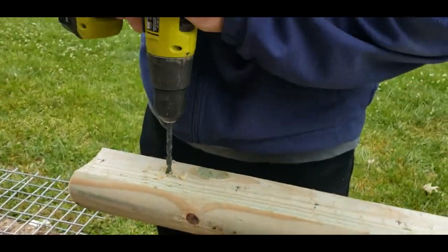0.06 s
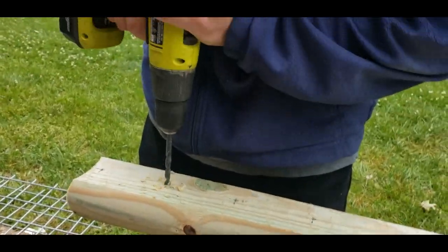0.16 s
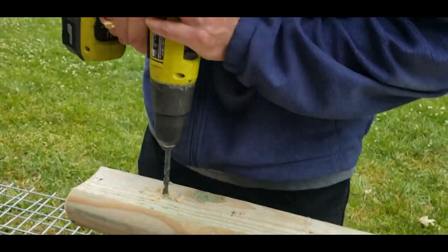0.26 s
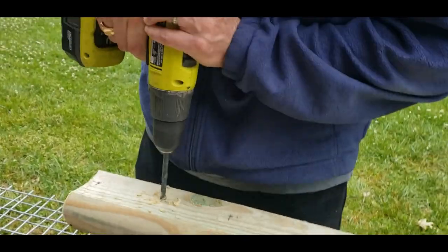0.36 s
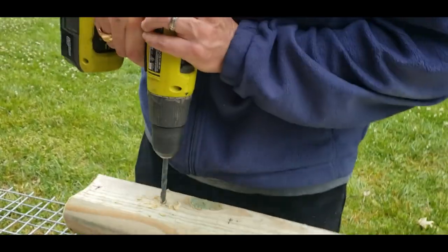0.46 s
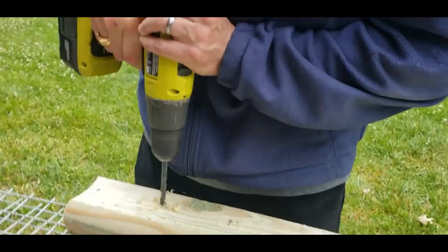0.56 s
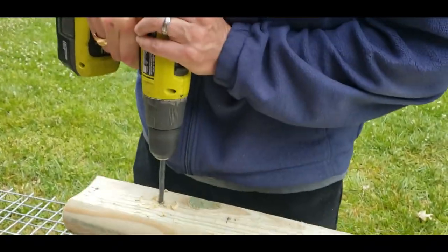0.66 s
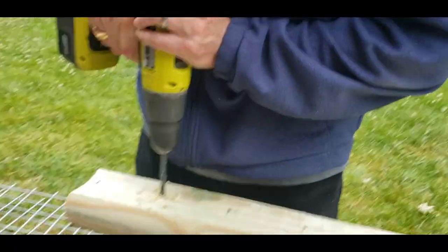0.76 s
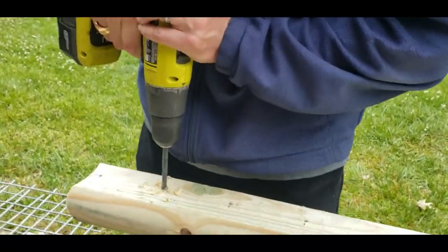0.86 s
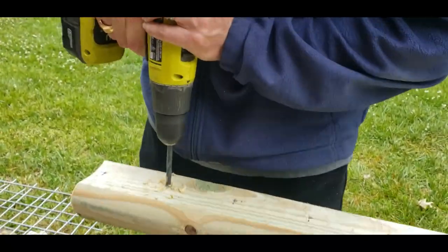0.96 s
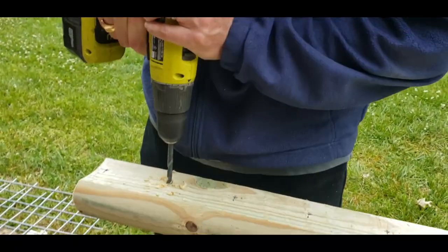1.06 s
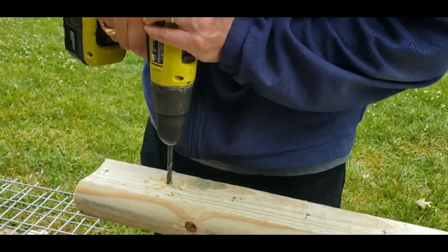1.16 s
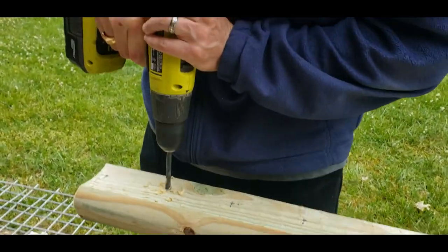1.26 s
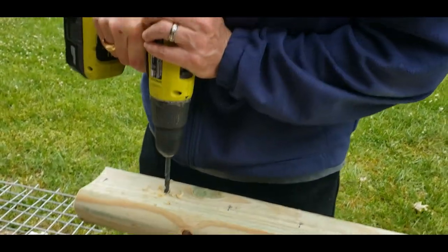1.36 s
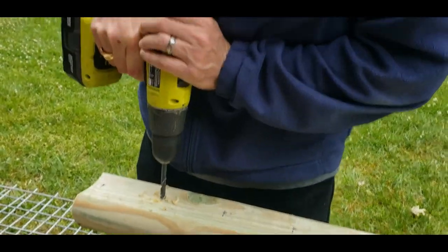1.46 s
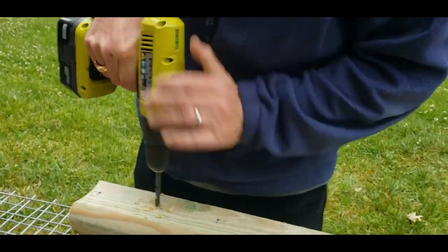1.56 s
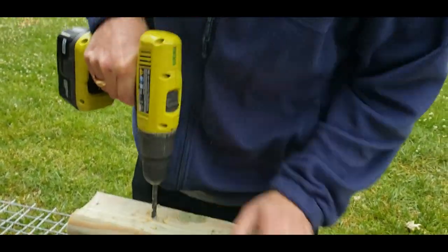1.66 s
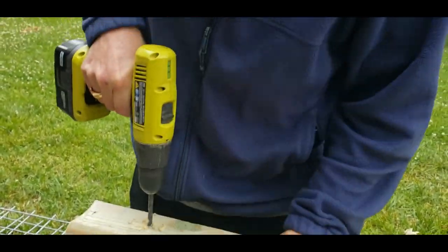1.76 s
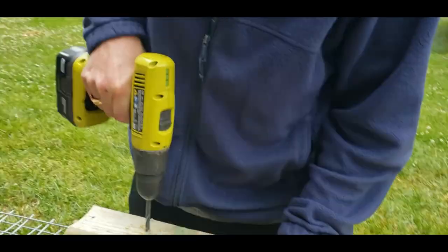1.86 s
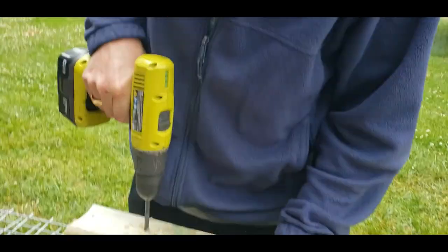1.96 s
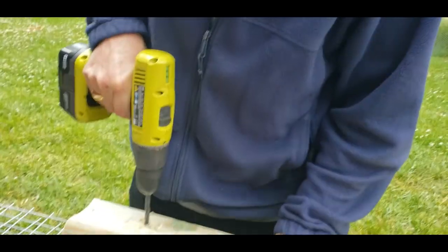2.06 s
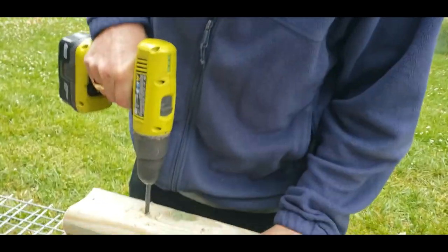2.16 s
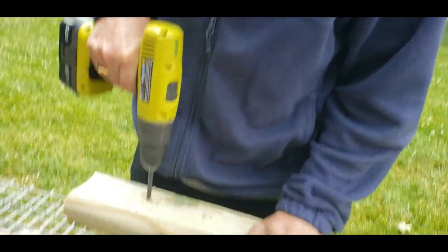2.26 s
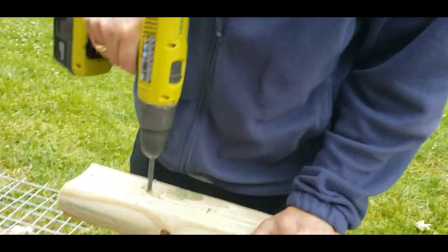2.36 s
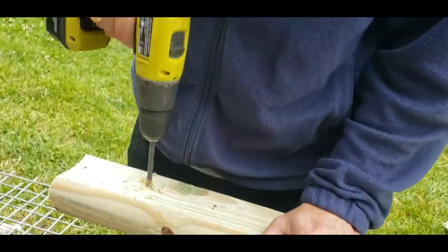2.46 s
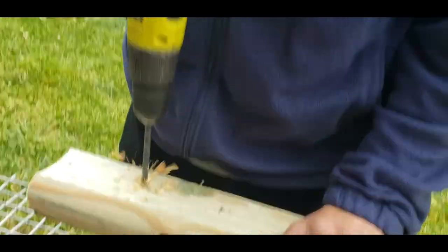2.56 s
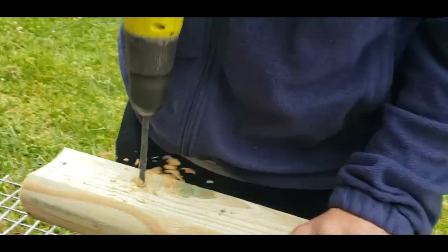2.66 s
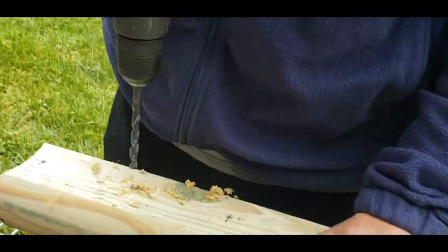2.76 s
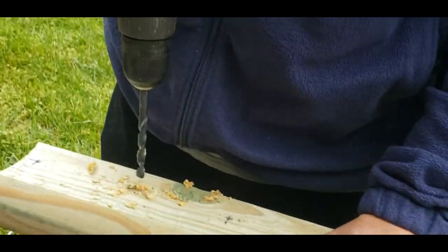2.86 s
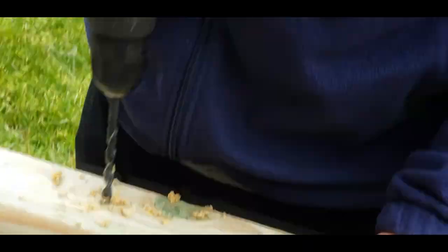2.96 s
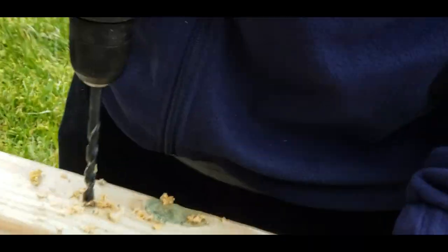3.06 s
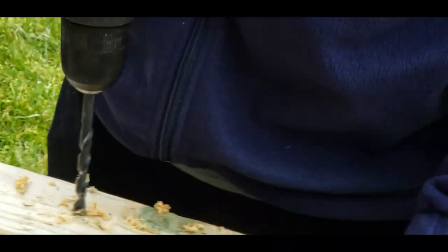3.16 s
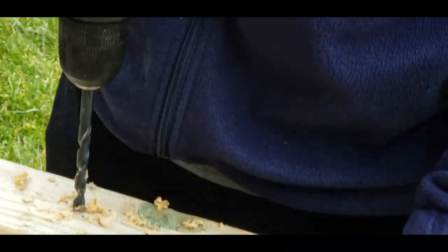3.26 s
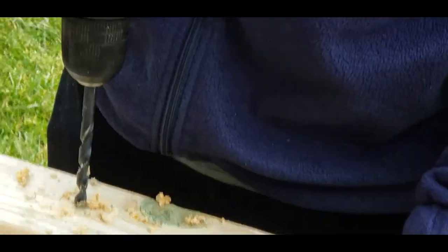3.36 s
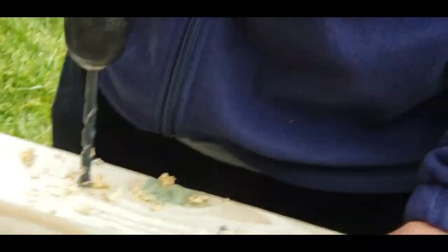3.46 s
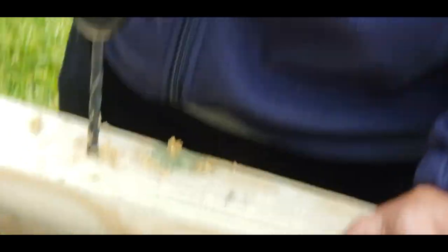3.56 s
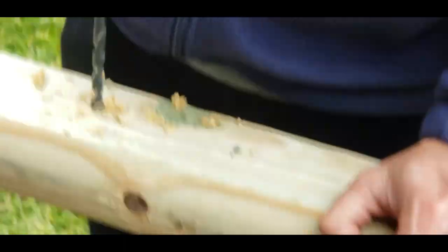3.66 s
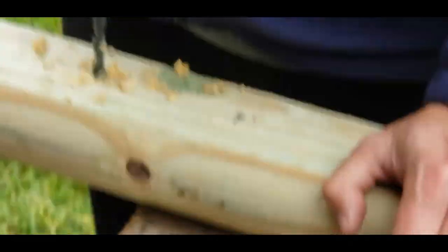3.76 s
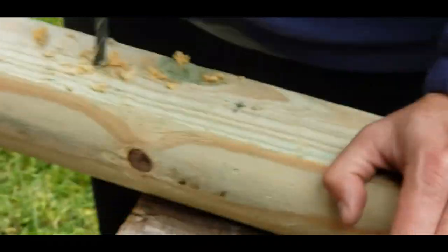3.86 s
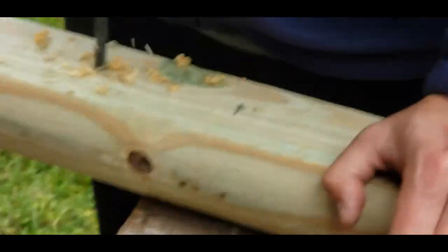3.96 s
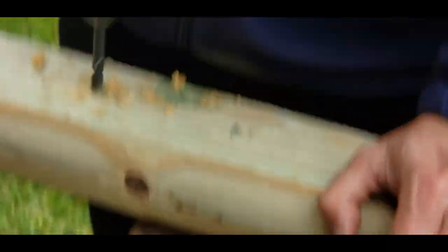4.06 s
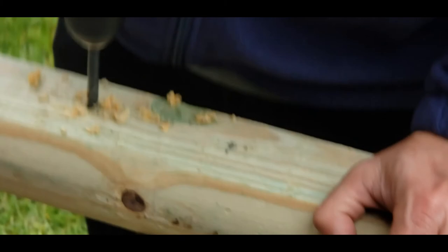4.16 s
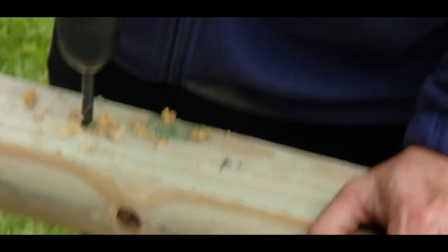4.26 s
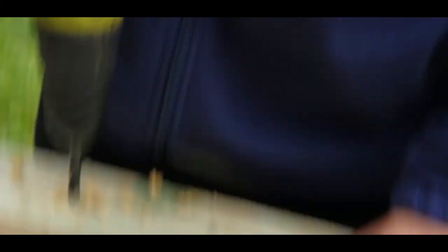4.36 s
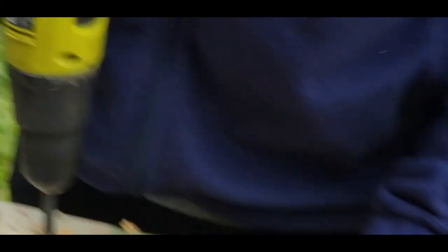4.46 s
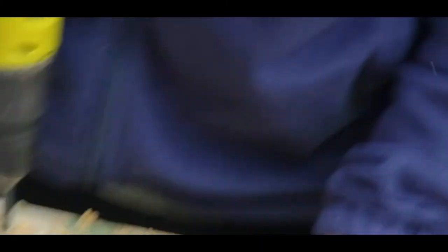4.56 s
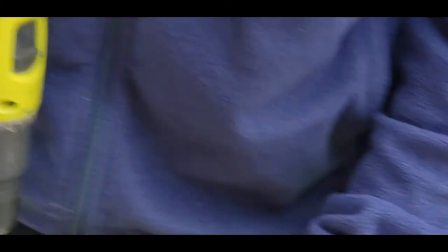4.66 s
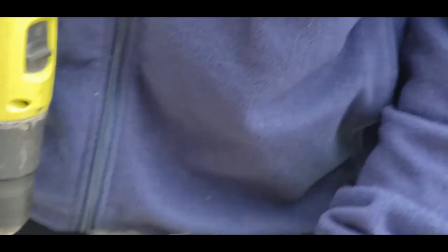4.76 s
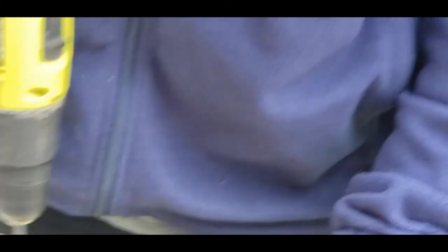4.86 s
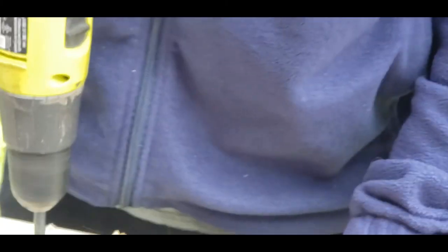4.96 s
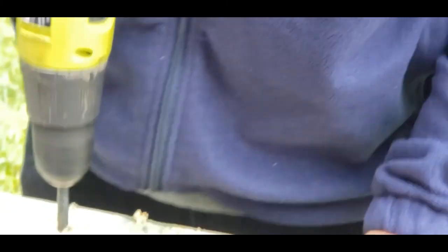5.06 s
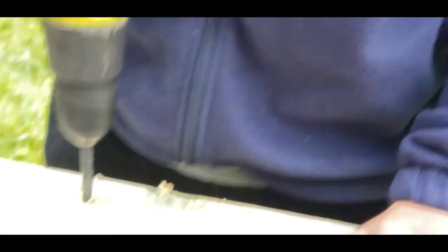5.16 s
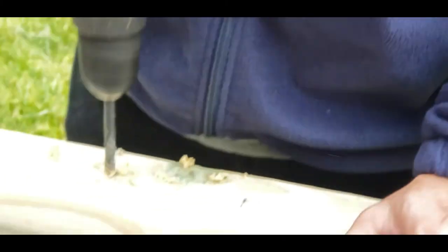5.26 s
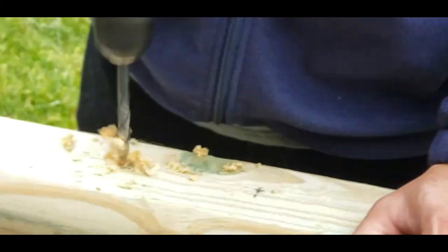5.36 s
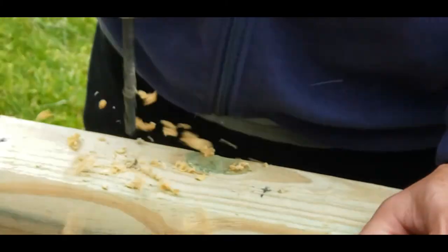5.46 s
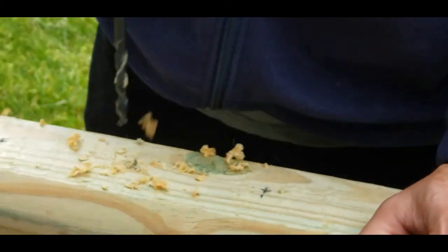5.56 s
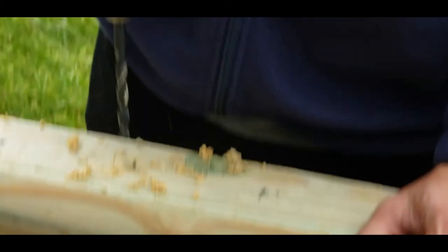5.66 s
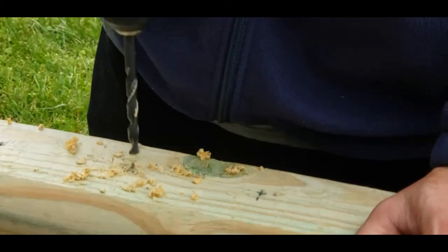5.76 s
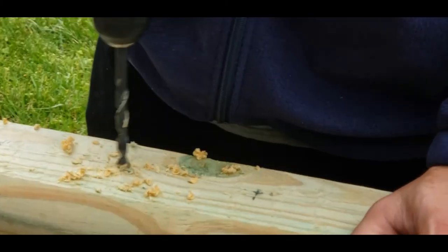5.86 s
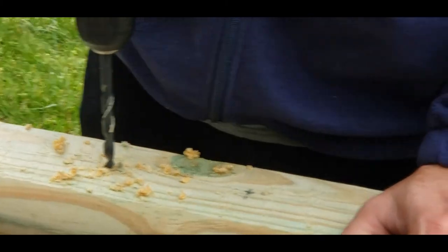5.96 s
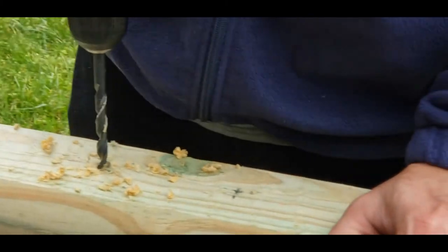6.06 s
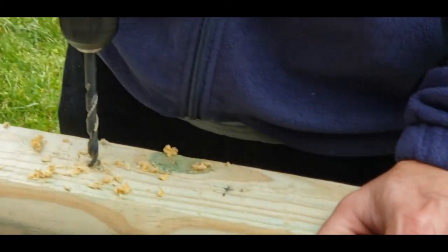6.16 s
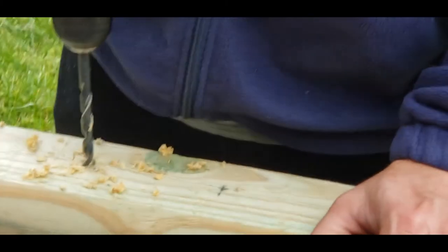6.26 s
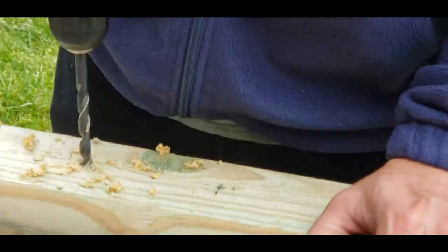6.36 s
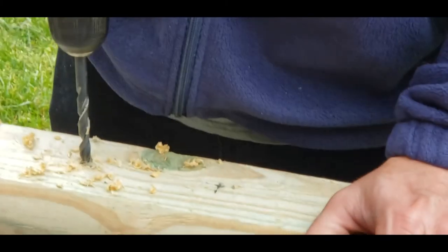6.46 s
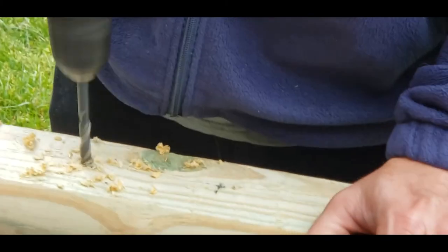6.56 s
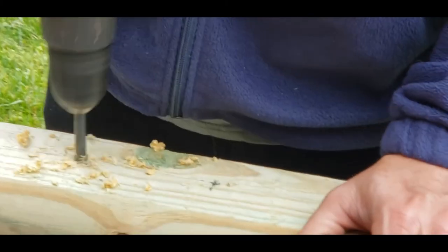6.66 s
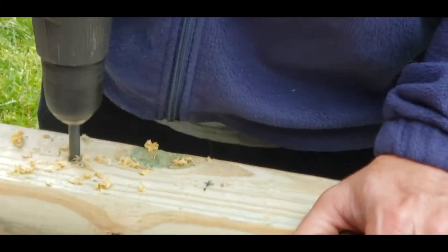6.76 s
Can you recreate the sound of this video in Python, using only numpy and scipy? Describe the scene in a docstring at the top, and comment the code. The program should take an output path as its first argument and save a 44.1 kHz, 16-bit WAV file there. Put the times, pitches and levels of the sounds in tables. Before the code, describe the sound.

A gritty electric drill with high gear whine, rattling housing and bright hiss bores wood nearby, outdoors and almost dry. Its pitch drops under load and climbs when the bit is pulled free. Four runs, the first and last cut short, are separated by near silence with a low garden rumble, tiny wood taps, dry scraping, crumbly chips and far-off small birds.

```python
"""A cordless drill whines, rattles and hisses as it bores a timber in four runs on a lawn; the timber rumbles and knocks.
Between runs the bit taps and scrapes the wood, loose chips rustle and small birds call far off.
One motor speed sets every gear tone and tooth click; it sags as the bit bites and rises as the bit is drawn out.
Shaped noise makes the cutting, brush hiss and rumble; short bursts of noise ring the wood for its knocks."""
import sys
import numpy as np
from scipy import signal
from scipy.fft import rfft, irfft, next_fast_len
from scipy.io import wavfile
from scipy.ndimage import uniform_filter1d, map_coordinates

SR = 44100
rng = np.random.default_rng(int(sys.argv[2]) if len(sys.argv) > 2 else 0)


def to_wav(sig):
    """Store sig (one row per channel, or 1-D mono) as 16-bit WAV at the path in sys.argv[1].

    Samples outside -1..1 are clipped; the rate is SR.
    """
    pcm = np.clip(np.atleast_2d(sig), -1, 1) * 32767
    pcm = np.round(pcm).astype(np.int16)
    wavfile.write(sys.argv[1], SR, pcm.T)  # frames by channels


N = 300002  # length [samples]
SUN, PLANET, RING = 12, 15, 42  # teeth on the wheels of the first gear stage
TURNS_PER_TOOTH = (SUN + RING) / (SUN * RING)  # motor shaft turns for each tooth that meshes

# how the tool tilts in the hand: (time [s], relative lean to the left [dB])
AIM = [(0, 1), (.7, 28.5), (1.15, 2.5), (2.8, -4.5), (3.9, 0), (6.8, -1.5)]


def amp(db):
    """Turn decibels into a gain."""
    return 10 ** (np.asarray(db) / 20)


def unit(x):
    """Scale to an rms (average strength) of 1."""
    return x / np.sqrt(np.mean(x ** 2) + 1e-20)


def along(points, hz):
    """Read a curve of (frequency [Hz], value) points on a log frequency axis."""
    point_hz, value = np.transpose(points)
    return np.interp(np.log(hz + 1), np.log(point_hz + 1), value)


def curves(rows):
    """Draw each column after the time as a curve with one value per sample."""
    s, *columns = np.transpose(rows)
    return [np.interp(np.arange(N) / SR, s, column) for column in columns]


def wobble(rate):
    """Draw a smooth random curve through `rate` random points a second."""
    points = rng.standard_normal(int(N * rate / SR) + 4)
    return map_coordinates(points, [np.arange(N) * rate / SR])


def swell(start, length):
    """Rise and fall roundly between 0 and 1; times in seconds."""
    u = np.clip((np.arange(N) / SR - start) / length, 0, 1)
    return np.sqrt(np.abs(np.sin(np.pi * u)))


def noise():
    """Make two unrelated white noises."""
    return rng.standard_normal((2, N))


def filtered(x, response):
    """Multiply the spectrum of x by a function of frequency."""
    m = next_fast_len(N + SR // 2)
    return irfft(rfft(x, m) * response(np.fft.rfftfreq(m, 1 / SR)), m)[..., :N]


def resonate(x, modes):
    """Ring x through resonances (centre [Hz], width [Hz], level [dB]) of alternating sign."""
    def response(f):
        total = 0
        for k, (centre, width, db) in enumerate(modes):
            damping = 1j * f * width
            total = total + (-1) ** k * amp(db) * damping / (centre * centre - f * f + damping)
        return total

    return filtered(x, response)


def peak(hz, centre, width):
    """Give the gain of one resonance for a tone that moves in pitch."""
    return 1 / np.sqrt(1 + (2 * (hz - centre) / width) ** 2)


def pan(x, lean_db):
    """Place a sound between left and right; lean_db is left minus right gain."""
    left = amp(np.atleast_1d(lean_db) / 2)
    return x * np.array([left, 1 / left]) * 2 / (left + 1 / left)


def radiate(drive, spectrum):
    """Colour two noises and spread them over left and right; their middle has rms 1."""
    # how wide the sound is: (frequency [Hz], side minus middle [dB])
    side_width = [(60, -11.5), (99, -3.5), (160, -8), (270, -4), (450, -3.5), (740, -4.5), (1220, -3.5),
                  (2010, -2), (3330, -1), (5500, 0), (9080, 0.5), (15000, 0)]
    # where each pitch leans: (frequency [Hz], left minus right gain [dB])
    side_lean = [(60, 6), (92, 2.5), (140, -1.5), (210, 2), (330, 1.5), (500, 10.5), (770, 1.5), (1170, 0),
                 (1790, 2.5), (2740, -1.5), (4190, 1), (6410, 9.5), (9810, -5), (15000, 13.5)]

    def colour(hz):
        return amp(along(spectrum, hz)) * np.array([np.ones_like(hz), amp(along(side_width, hz))])

    def lean(hz):
        lean_db = along(side_lean, hz)
        return amp(np.outer([.5, -.5], lean_db)) / np.sqrt(np.cosh(np.log(amp(lean_db))))

    middle, side = filtered(drive, colour)
    pair = filtered(np.array([middle + side, middle - side]), lean)
    return pair / np.sqrt(np.mean(pair.mean(0) ** 2))


def scatter(x, t60):
    """Blur x with diffuse echoes, different left and right, that fall 60 dB in t60 seconds."""
    t = np.arange(SR // 2) / SR
    tail = rng.standard_normal((2, len(t))) * amp(-60 * t / t60)
    return signal.fftconvolve(x[None], tail / np.linalg.norm(tail[0]), axes=1)[:, :N]


def speckle(x, depth_db):
    """Vary the gain in random patches, as the bit sinks and the tool's resonances and echoes shift."""
    z = signal.stft(x, nperseg=2048)[2]
    patches = rng.standard_normal(z.shape[1:])
    patches = uniform_filter1d(patches, size=7, axis=0)  # smooth over frequency
    patches = uniform_filter1d(patches, size=12, axis=1)  # smooth over time
    return unit(signal.istft(z * amp(depth_db * unit(patches)), nperseg=2048)[1][:, :N])


def motor():
    """Spin the motor up to the speed the wood allows, then brake it on release.

    Gives the tooth meshing rate, the share of allowed speed reached in spin-up, and a law-to-gain function."""
    # pulls of the trigger: (pressed [s], released [s], spin-up time constant [s],
    # time constant of leaning on the tool [s], level [dB])
    runs = [(-0.3, 0.054, 0.049, 0.05, -0.5), (0.145, 2.768, 0.045, 0.028, 0.04),
            (3.776, 5.594, 0.033, 0.071, 0), (6.492, 7.1, 0.04, 0.055, -0.36)]
    # speed the wood allows, one curve per run: (time [s], tooth meshing rate [Hz])
    allowed_speed = [
        [(0, 3120), (0.06, 2993)],
        [(0.42, 2835), (0.58, 2952), (0.8, 2923), (1.0, 2889), (1.15, 2795), (1.4, 2738), (1.55, 2792),
         (1.75, 2826), (2.05, 2744), (2.23, 2655), (2.36, 2901), (2.56, 3090), (2.7, 3143), (2.78, 3075)],
        [(3.98, 2878), (4.22, 2606), (4.42, 2450), (4.62, 2523), (4.75, 2503), (4.96, 2411), (5.16, 2802),
         (5.38, 3060), (5.5, 3134), (5.58, 3114)],
        [(6.69, 2996), (6.76, 2601), (6.8, 2556)],
    ]
    free_hz = 3124  # meshing rate when spinning in air
    heavy_sag_hz, bite_sag_hz = 720, 120  # drop in rate under heavy load; as the edges first bite
    pressure_power = 1.9  # loudness grows as this power of pressure
    brake_db_per_s, coast_s = 517.5, 0.5  # after release: fall in level; time constant of slowing
    entry_s = 0.7  # time constant of the bit's chatter before its hole steadies it

    t = np.arange(N) / SR
    state = np.zeros((5, N))
    for (on, off, spin_up_s, lean_s, db), speed in zip(runs, allowed_speed):
        allowed_hz, = curves(speed)
        age = np.maximum(t - on, 0)
        released = np.maximum(t - off, 0)
        spin = 1 - np.exp(-age / spin_up_s)
        mesh_hz = allowed_hz * spin * np.exp(-released / coast_s)
        pressure = 1 - np.exp(-age / lean_s)
        drive = pressure ** pressure_power * amp(db - brake_db_per_s * released)
        sag_hz = np.maximum(free_hz - allowed_hz, 0)
        state = np.where(t >= on, [mesh_hz, spin, drive, sag_hz, age], state)

    mesh_hz, spin, drive, sag_hz, age = state
    spinning_free = np.exp(-sag_hz / bite_sag_hz)
    heavy_load = sag_hz / heavy_sag_hz
    entry = np.exp(-age / entry_s)
    conditions = np.array([np.ones(N), spinning_free, heavy_load, entry])
    return mesh_hz, spin, lambda law: drive * amp(np.dot(law, conditions))


def tooth_hits(mesh, loose):
    """Click once per tooth; sizes repeat with each planet turn, and play in the gears makes them vary."""
    teeth = np.arange(1, int(mesh[-1]))
    at = np.interp(teeth, mesh, np.arange(N))  # position of each tooth [samples]
    repeating = rng.standard_normal(PLANET)[teeth % PLANET]
    size = repeating + loose * rng.standard_normal(N // 8)[teeth]
    # a click between two samples is a short windowed sinc
    places = at.astype(int)[:, None] + np.arange(-7, 9)
    offset = places - at[:, None]
    click = size[:, None] * np.sinc(offset) * np.cos(np.pi * offset / 16) ** 2
    return unit(np.bincount(np.clip(places, 0, N - 1).ravel(), click.ravel(), N))


def clatter(mesh, loose):
    """Make separate tooth clicks for left and right."""
    return np.array([tooth_hits(mesh, loose), tooth_hits(mesh, loose)])


def whine(mesh, swing_db, order, rough, flutter_db):
    """Sing a gear tone left and right, throbbing with the planets and smeared by backlash."""
    def voice():
        loudness = amp(swing_db + flutter_db * wobble(70))
        phase = 2 * np.pi * (order * mesh + rng.random()) + rough * wobble(160)
        return unit(loudness * np.sin(phase))

    return np.array([voice(), voice()])


def gear_tones(mesh, mesh_hz, spin, level):
    """Sing gear and fan tones, loud where they meet a case resonance; slack teeth smear them in spin-up."""
    # resonances of the gear case: (centre [Hz], width [Hz], level [dB])
    case_modes = [(2730, 590, -30.5), (4200, 540, -24), (4985, 270, -24), (5510, 210, -29.5),
                  (5878, 130, -22), (7400, 700, -31), (8480, 800, -41.5)]
    # level of each tone: (while boring [dB], change when spinning free [dB],
    # change under heavy load [dB], change on entry [dB])
    planet_law = (-11.5, 9, 0, -9)
    first_law = (-5, -12, -1.5, 11.5)
    second_law = (0.5, -13.5, -1, 2.5)
    third_law = (2.6, -11, 1.5, -4)
    fan_law = (-22, 6.5, -0.5, -1)
    swing = np.sin(2 * np.pi * mesh / PLANET)
    slack = 1.2 * (1 - spin)

    def tone(law, order, throb_db, rough, flutter_db):
        power = sum((amp(db) * peak(order * mesh_hz, hz, width) ** 2) ** 2 for hz, width, db in case_modes)
        voices = whine(mesh, throb_db * swing, order, rough + slack, flutter_db)
        return level(law) * np.sqrt(power) * voices

    song = tone(planet_law, order=20 / PLANET, throb_db=1, rough=.4, flutter_db=2.5)
    # the meshing rate itself rocks the case from side to side, so left and right are opposite
    first = tone(first_law, order=1, throb_db=3, rough=1.3, flutter_db=3)[0] * np.array([[1], [-1]])
    second = tone(second_law, order=2, throb_db=3.5, rough=.4, flutter_db=2.5)
    third = tone(third_law, order=3, throb_db=2.5, rough=.5, flutter_db=3)
    # twelve fan blades pass in each turn of the shaft
    fan = tone(fan_law, order=12 * TURNS_PER_TOOTH, throb_db=1, rough=.3, flutter_db=2)
    aim_db, = curves(AIM)
    low = pan(song + fan, lean_db=1.0) + pan(first, lean_db=-4)
    return low + pan(second, aim_db + 7) + pan(third, lean_db=-5.5)


def cutting(mesh, level, judder, shade_db):
    """Tear the wood fibres: uneven noise and tooth clicks shaken by the judder; also gives the timber's groan."""
    # colours of the cut and of the timber's hollow response: (frequency [Hz], relative level per Hz [dB])
    cut_colour, groan_colour = [(420, -56.5), (720, -14), (899, -7.5), (1020, -2.5), (1230, -4.5),
                                (1340, -2), (1440, -3), (2440, 0), (2880, 0.5), (3210, -2), (3600, -1),
                                (4680, -33.5), (7920, -120)], [(300, -30.5), (400, -7.5), (470, -3), (560, -7), (740, 6),
                                             (850, -3.5), (1200, -39.5), (3000, -88)]
    # levels: (while boring [dB], change when free [dB], change under heavy load [dB], change on entry [dB])
    cut_law, groan_law = (-34, -2.2, 3.3, 1), (-64.5, 0.5, 12, 8.5)

    def tearing():
        return unit(noise() * amp(1.7 * wobble(900))) + clatter(mesh, loose=1.5)

    torn = speckle(tearing(), depth_db=2.5) * amp(judder)
    cut = level(cut_law) * amp(0.4 * shade_db) * radiate(torn, cut_colour)
    groan = level(groan_law) * radiate(speckle(tearing(), depth_db=3), groan_colour)
    return cut, groan


def gear_rattle(mesh, level, judder, aim_db):
    """Rattle the housing with noise and tooth clicks that throb once per planet turn."""
    # colour of the housing: (frequency [Hz], relative level per Hz [dB])
    housing_colour = [(1760, -32), (3000, -5.5), (3190, -10.5), (3860, -1.5), (4090, 2.5), (4420, -1),
                      (4810, 3), (5230, -1), (5780, 2), (8290, -7), (9260, -8.5), (10200, -19.5),
                      (10500, -15.5), (13600, -41), (22000, -120)]
    # level: (while boring [dB], change when free [dB], change under heavy load [dB], change on entry [dB])
    rattle_law = (-28.5, -4.5, 2, 3.5)
    knocking = amp(judder + 1.0 * np.sin(2 * np.pi * mesh / PLANET) + 0.57 * wobble(800))
    shaken = speckle(noise() + 0.66 * clatter(mesh, loose=0.94), depth_db=2.5) * knocking
    return pan(level(rattle_law) * radiate(shaken, housing_colour), 0.17 * aim_db)


def brush_hiss(shaft, level, judder, aim_db, shade_db):
    """Hiss as the brushes spark: noise that swells twice per shaft turn."""
    # colour of the sparks: (frequency [Hz], relative level per Hz [dB])
    brush_colour = [(5880, -46.5), (10000, -15), (10500, -16), (11500, -4.5), (12800, -8.5), (13900, 3),
                    (14500, 0), (15400, 0), (16000, -9)]
    # level: (while boring [dB], change when free [dB], change under heavy load [dB], change on entry [dB])
    brush_law = (-30, -0.3, 1, 0.8)
    twice_a_turn = .9 * np.sin(4 * np.pi * shaft)
    sparks_db = judder + .6 * wobble(30) + twice_a_turn + 0.59 * wobble(1100)
    sparks = speckle(noise(), depth_db=3.7) * amp(sparks_db)
    return pan(level(brush_law) * amp(shade_db) * radiate(sparks, brush_colour), 0.61 * aim_db)


def timber(shaft, mesh_hz, level, groan):
    """Shake the timber: the unbalanced shaft makes it hum, the cutting edges make it rumble and groan."""
    # the timber's bending resonance: (centre [Hz], width [Hz])
    hum_mode = (321.3, 25)
    # colour of the rumble: (frequency [Hz], relative level per Hz [dB])
    rumble_colour = [(15, -46.5), (25, -19.5), (59, -5.5), (113, -1), (188, 0.5), (240, -7.5), (300, 0),
                     (375, -13.5), (480, -8), (620, -39), (1060, -120)]
    # bouts of extra shaking: the bit skates on the surface at first, later the timber rocks on its support:
    # (start [s], length [s], extra rumble and groan [dB])
    rumble_bouts = [(0, 0.19, 9.5), (0.941, 0.37, 10)]
    # levels: (while boring [dB], change when free [dB], change under heavy load [dB], change on entry [dB])
    hum_law, rumble_law = (-48, -3, -3, -1.5), (-50.5, -15, 1, 9)
    hum = unit(np.sin(2 * np.pi * shaft + .25 * wobble(40))) * amp(1.5 * wobble(25))
    hum = hum * level(hum_law) * peak(mesh_hz * TURNS_PER_TOOTH, *hum_mode)
    rumble = level(rumble_law) * radiate(noise() * amp(3.5 * wobble(30)), rumble_colour)
    bout_db = sum(db * swell(s, length) for s, length, db in rumble_bouts)
    return pan(hum, lean_db=4.0) + amp(bout_db) * (pan(rumble, lean_db=0) + groan)


def drill():
    """Drive gears, brushes and bit from one shaft; its speed and load set every level."""
    # the second hand covers the vents and damps the tool a little: (time [s], change of brush hiss [dB])
    vent_shade = [(0.48, 1.5), (0.65, -8.5), (0.8, -3.5), (1.45, -2.5), (1.6, 1)]
    mesh_hz, spin, level = motor()
    aim_db, = curves(AIM)
    shade_db, = curves(vent_shade)
    mesh = np.cumsum(mesh_hz * (1 + 0.002011 * wobble(30))) / SR  # teeth meshed so far
    shaft = mesh * TURNS_PER_TOOTH  # turns so far
    # the bit catches and slips in the fibres, shaking the whole tool [dB]
    judder = .6 * wobble(35) + 1.0 * wobble(260)
    cut, groan = cutting(mesh, level, judder, shade_db)
    rattle = gear_rattle(mesh, level, judder, aim_db)
    hiss = brush_hiss(shaft, level, judder, aim_db, shade_db)
    shaken = timber(shaft, mesh_hz, level, groan)
    return cut + rattle + hiss + shaken + gear_tones(mesh, mesh_hz, spin, level)


def garden():
    """Make a low outdoor rumble and a faint hiss from slowly wavering noise."""
    # colour of the garden: (frequency [Hz], relative level per Hz [dB])
    garden_colour = [(20, -19), (45, -7), (76, -2.5), (125, -13.5), (300, -25.5), (680, -30.5), (1100, -42),
                     (2300, -41), (4500, -50), (6500, -45), (9000, -56.5), (16000, -63)]
    return amp(-64.5 + 1.2 * wobble(2.7)) * radiate(noise(), garden_colour)


def blows(rows, modes, t60):
    """Strike the modes with short noise bursts (time [s], level [dB]); t60 [s] is each burst's fade."""
    t = np.arange(SR // 10) / SR
    force = np.zeros(N + SR)
    for s, db in rows:
        burst = unit(rng.standard_normal(len(t)) * amp(-60 * t / t60))
        force[round(s * SR):][:len(t)] += amp(db) * burst
    ring = resonate(force[:N], modes)
    return ring / np.abs(ring).max() * amp(max(db for s, db in rows))


def knocks():
    """Click and thud where bit and chips tap the timber; only thud where it bumps on its support."""
    # bit and chips tapping the timber: (time [s], click level [dB], thud relative to click [dB])
    tap_times = [(0.1416, -26.5, -17), (3.0774, -60, -13.5), (3.138, -61, -13.5), (5.6954, -35.5, -12),
                 (5.9803, -51, -14), (6.0056, -36.5, -27), (6.1462, -48, -23), (6.2932, -28, -23),
                 (6.5034, -42, -27), (6.5134, -21, -22.5)]
    # the timber bumping on its support: (time [s], level [dB])
    bump_times = [(1.007, -29.5), (1.077, -22.5), (1.224, -29), (4.455, -28), (5.699, -47.5), (5.942, -47),
                  (6.232, -54), (6.531, -33)]
    # resonances of the click and of the timber: (centre [Hz], width [Hz], level [dB])
    tap_modes, timber_modes = [(1100, 100, -5.5), (1757, 210, 0.5), (2370, 430, 2.5), (3380, 860, -4.5),
                               (4580, 460, -6.5), (5810, 990, -6), (6960, 950, -9), (12400, 3000, -18.5)], [(200, 92, 0), (336, 240, 0), (502, 250, -0.5),
                                                  (740, 230, -5.5), (1100, 350, -12.5)]
    clicks = blows([(s, db) for s, db, thud_db in tap_times], tap_modes, t60=0.018)
    thuds = blows([(s, db + thud_db) for s, db, thud_db in tap_times], timber_modes, t60=.015)
    bumps = blows(bump_times, timber_modes, t60=0.028)
    wood = amp(0.5) * scatter(clicks, t60=.004) + amp(1.0) * thuds + amp(-2.5) * pan(bumps, lean_db=11.5)
    return wood + amp(-10.5) * scatter(clicks + thuds, t60=0.22)


def thumps():
    """Swing two and a half low cycles for each soft jolt, mostly on the right."""
    # soft low thumps on the microphone: (time [s], pitch [Hz], level [dB])
    jolts = [(1.008, 55.5, -32), (1.123, 107, -38), (1.22, 100, -33.5), (1.252, 110, -31)]
    t, out = np.arange(N) / SR, np.zeros(N)
    for s, hz, db in jolts:
        cycles = np.clip((t - s) * hz, 0, 2.5)
        out += amp(db) * np.sin(2 * np.pi * cycles) * np.sin(np.pi * cycles / cycles.max())
    return pan(out, lean_db=-18.5)


def birds():
    """Glide far-off warbling calls from one pitch to another, blurred by trees and walls."""
    # bird calls: (time [s], length [s], start pitch [Hz], end pitch [Hz], relative level [dB])
    bird_calls = [(2.947, 0.35, 6500, 6040, -79.5), (3.129, 0.16, 2840, 2420, -75.5),
                  (3.235, 0.06, 2170, 2110, -71), (5.741, 0.096, 2210, 2420, -76),
                  (5.904, 0.0765, 2780, 3150, -71.5), (6.032, 0.11, 2930, 3480, -62),
                  (6.096, 0.12, 2610, 2440, -63.5)]
    t, calls = np.arange(N) / SR, np.zeros(N)
    quaver = 1 + 0.041 * wobble(130)
    for s, length, start_hz, end_hz, db in bird_calls:
        u = np.clip((t - s) / length, 0, 1)
        pitch_hz = (start_hz + (end_hz - start_hz) * u) * quaver
        calls += amp(db) * np.sin(np.pi * u) * np.sin(2 * np.pi * np.cumsum(pitch_hz) / SR)
    return amp(4.5) * scatter(calls, t60=0.78)


def crumbs():
    """Crack sparsely as shavings are crushed around the hole: noise with wild level swings."""
    # loose chips rustling under the bit: (time [s], length [s], level [dB])
    rustles = [(2.98, 0.1, -77), (3.15, 0.1, -82), (5.868, 0.029, -70), (6.206, .2, -68.5),
               (6.443, 0.058, -67)]
    stir = sum(amp(db) * swell(s, length) for s, length, db in rustles)
    chip_modes = [(2800, 2000, -10), (6550, 1200, 1.5), (12000, 4000, -22)]  # centre, width [Hz], level [dB]
    return stir * unit(resonate(noise() * amp(5.7 * wobble(370)), chip_modes))


def scrapes():
    """Drag the bit's tip over the grain to the next hole: rough noise in short strokes."""
    # strokes over the wood: (time [s], length [s], level [dB])
    strokes = [(3.428, 0.065, -66.5), (3.47, 0.12, -65.5), (3.562, 0.19, -72.5), (3.662, 0.22, -57)]
    # colour of the scraping: (frequency [Hz], relative level per Hz [dB])
    scrape_colour = [(180, -39), (300, -8), (600, -1), (953, -8), (2740, -1), (4720, -9), (9290, -18),
                     (11300, -14), (15500, -17)]
    stroke = sum(amp(db) * swell(s, length) ** 2 for s, length, db in strokes)
    return stroke * radiate(noise() * amp(1.8 * wobble(400)), scrape_colour)


def scene():
    """Put the drill and timber close by, with a faint echo of the drill and the garden behind."""
    tool = drill()
    echo = scatter(resonate(tool.mean(0), [(4000, 6000, -0.5), (4180, 200, 4.5)]), t60=0.6)
    near = tool + amp(-29) * echo + knocks() + thumps() + crumbs() + scrapes()
    return near + birds() + pan(garden(), lean_db=-2)


def record(dry):
    """Remove the highest treble with a steep but smooth cut."""
    top_hz = 15800  # half the amplitude is left here
    return filtered(dry, lambda hz: .5 - .5 * np.tanh((hz - top_hz) / 90))


dry = scene()
out = record(dry)
to_wav(out)
```